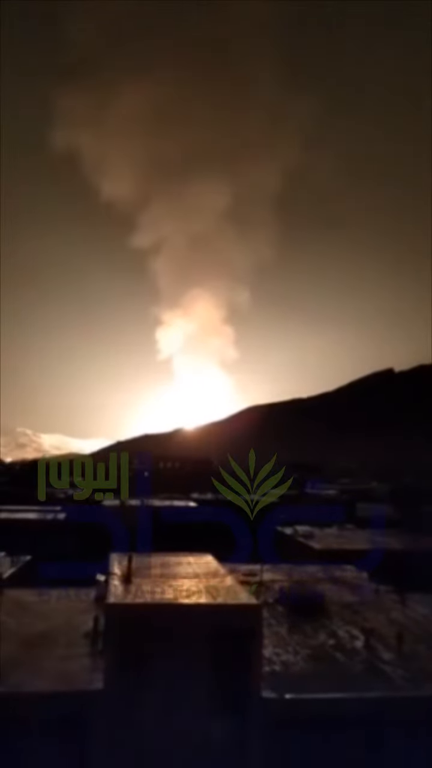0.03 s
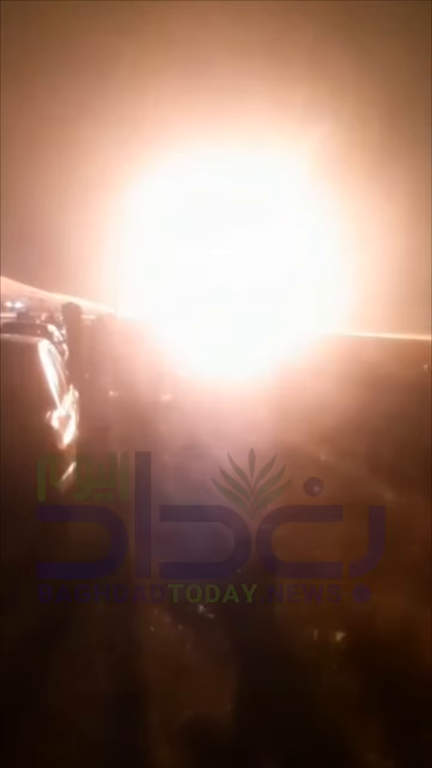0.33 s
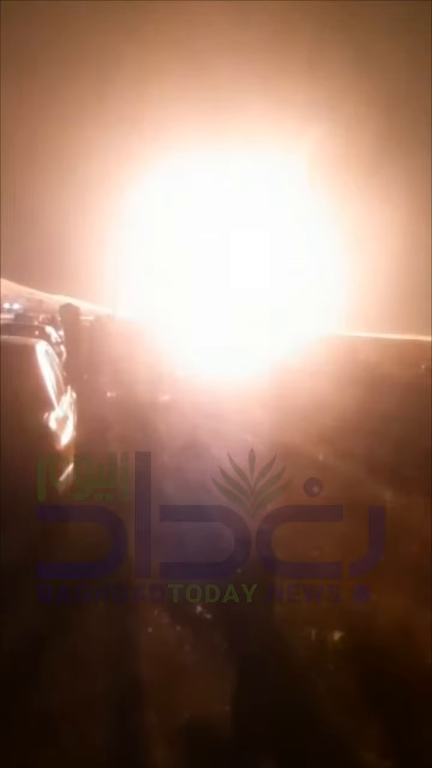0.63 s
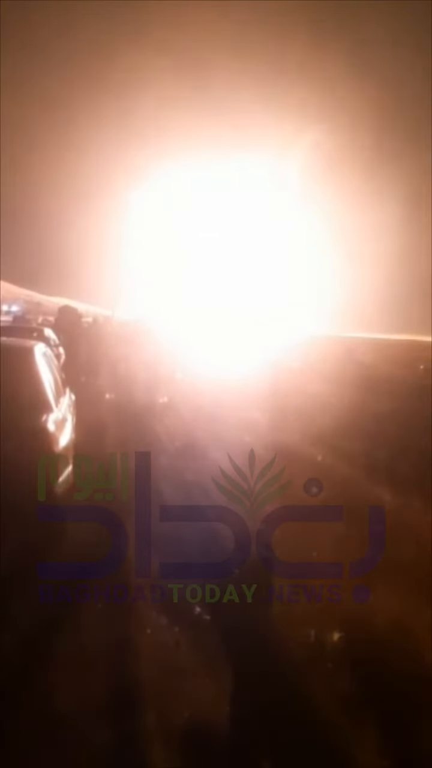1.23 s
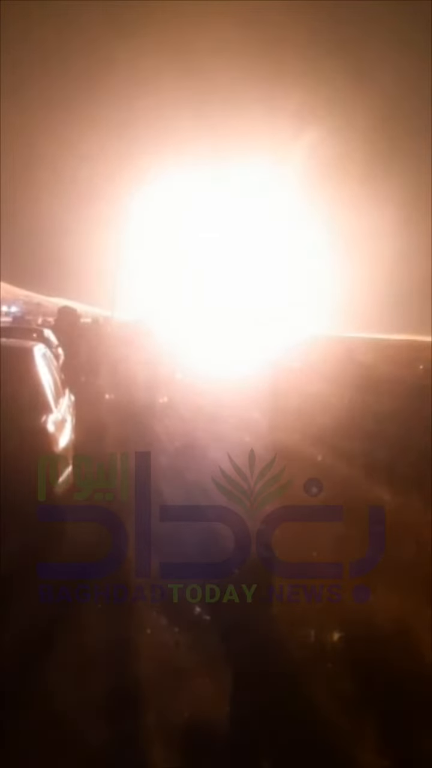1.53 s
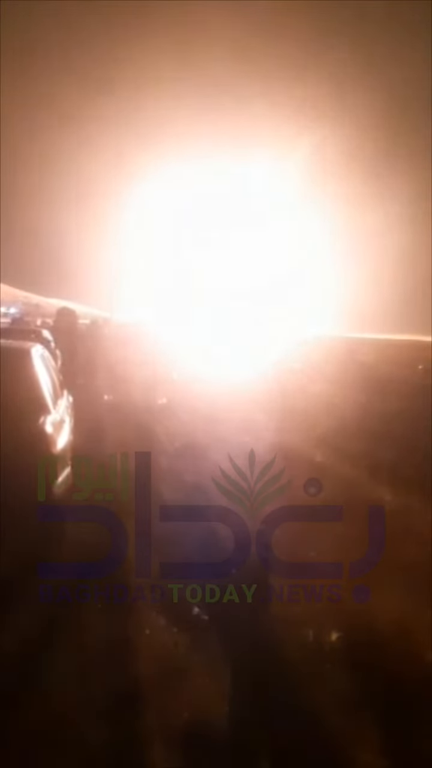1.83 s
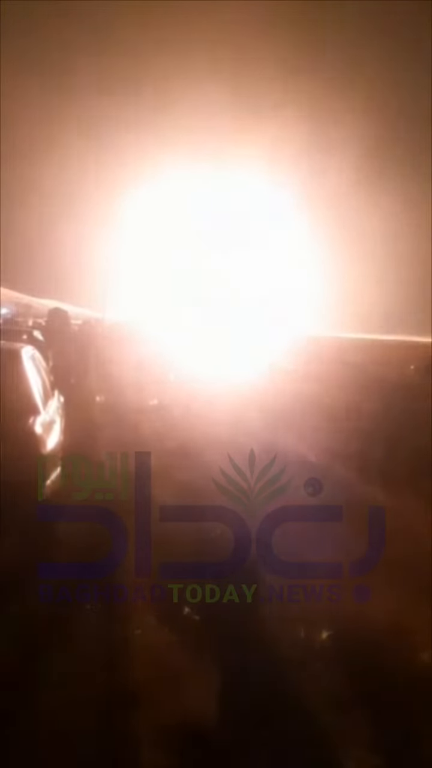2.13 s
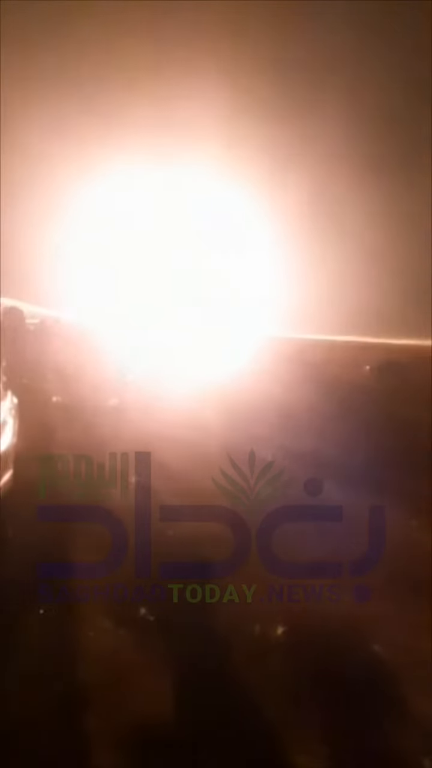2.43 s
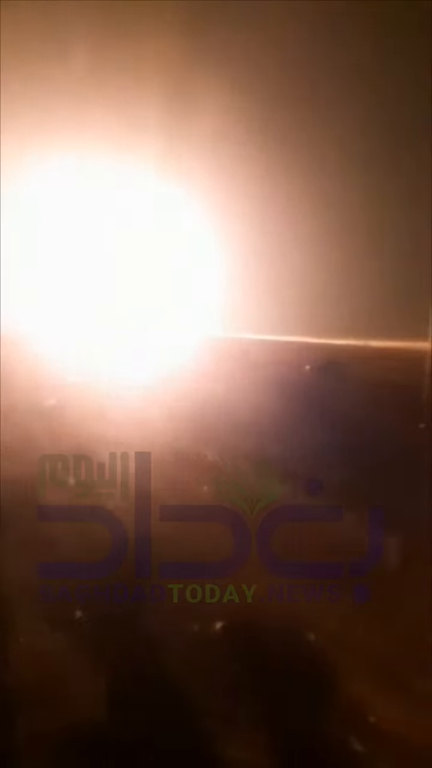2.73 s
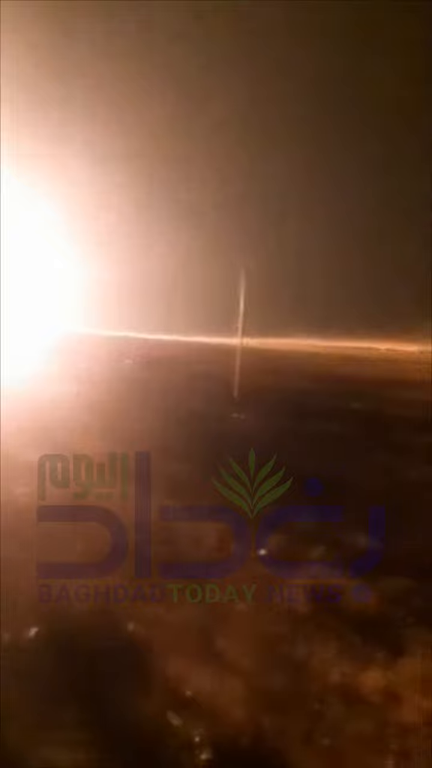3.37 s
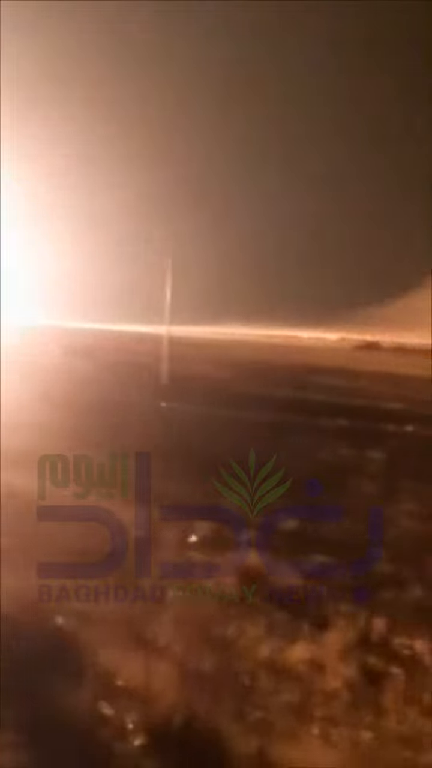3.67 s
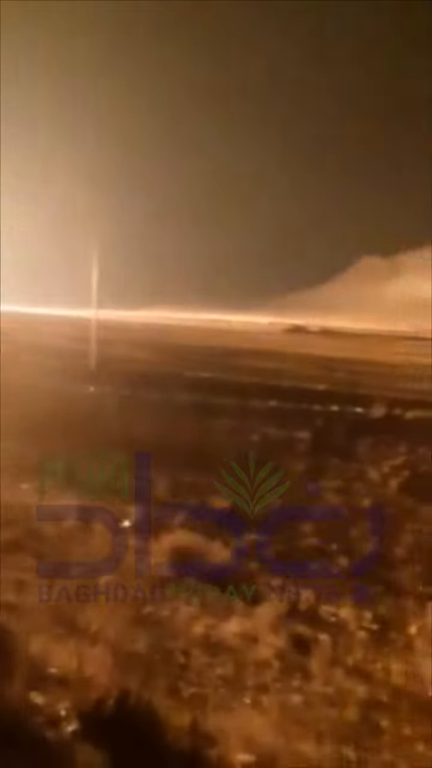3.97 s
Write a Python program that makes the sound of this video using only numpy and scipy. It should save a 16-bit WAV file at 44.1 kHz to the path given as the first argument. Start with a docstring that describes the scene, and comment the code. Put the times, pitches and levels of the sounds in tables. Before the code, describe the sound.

Heavy, continuous roar of a large gas blaze with deep throbs and a faint passing hiss.

```python
"""A huge gas fire burns outdoors at night. At first it is dull and far off, with deep throbs and surges of
billowing gas and a faint rustle. At 0.19 s the scene changes with a soft click and it is suddenly close: a dry
tick sounds, and turbulence makes a broad roar over a rumble. Near 1 s a hiss with a low drone, like a vehicle
on a wet road, passes from right to left. From 2.8 s the microphone turns away and the roar changes colour. At
the end a second hiss approaches."""
import sys
import numpy as np
from scipy import signal
from scipy.fft import rfft, irfft
from scipy.io import wavfile
from scipy.ndimage import uniform_filter1d, map_coordinates

SR = 44100
rng = np.random.default_rng(int(sys.argv[2]) if len(sys.argv) > 2 else 0)


def dump(signal):
    """Clip the signal to [-1, 1] and save it as 16-bit WAV at the path in sys.argv[1]."""
    limited = np.clip(np.atleast_2d(signal).T, -1, 1)
    pcm = np.round(limited * 32767).astype(np.int16)
    wavfile.write(sys.argv[1], SR, pcm)


N = 176400
TIME, HZ = np.arange(N) / SR, np.fft.rfftfreq(N, 1 / SR)
NEAR_FROM_S = 0.19


def amp(db):
    """Amplitude grows tenfold for every 20 dB."""
    return 10 ** (np.asarray(db) / 20)


def unit_rms(x):
    """Dividing by the rms value keeps a signal's shape and sets its power to one."""
    return x / np.sqrt(np.mean(abs(x) ** 2) + 1e-20)


def over_hz(table, column=1):
    """Interpolation on a logarithmic frequency axis makes a column a spectrum."""
    rows = np.array(table, float)
    return np.interp(np.log(HZ + 1), np.log(rows[:, 0] + 1), rows[:, column])


def over_time(table, column=1):
    """Linear interpolation gives a column a value at every sample."""
    rows = np.array(table, float)
    return np.interp(TIME, rows[:, 0], rows[:, column])


def white_spectrum():
    """White noise has random phase and equal mean power at all frequencies."""
    return rng.standard_normal(len(HZ)) + 1j * rng.standard_normal(len(HZ))


def low_pass(x, corner_hz, slope=4):
    """Above its corner, a low-pass filter tends to lose 6 dB per octave per unit of slope."""
    return irfft(rfft(x) / (1 + (HZ / corner_hz) ** slope), N)


def wander(rate_hz):
    """Low-passed noise is a slow random fluctuation, here of rms 1."""
    return unit_rms(irfft(white_spectrum() / (1 + (HZ / rate_hz) ** 4), N))


def pan(balance_db):
    """A level difference places a sound; balance is left minus right."""
    return amp(np.array([[0.5], [-0.5]]) * balance_db)


def stereo_noise(colour_db, coherence, left_lead=0, balance_db=0):
    """Partial coherence: two microphone ports share part of one noise, scaled to rms 1."""
    coherence = np.clip(coherence, 0, 1)
    left = white_spectrum()
    right = (coherence * left + np.sqrt(1 - coherence ** 2) * white_spectrum()) * np.exp(-1j * left_lead)
    return unit_rms(irfft(np.array([left, right]) * amp(colour_db) * pan(balance_db), N))


def burst(centre_s, half_length_s, hz, width_hz, db):
    """A Gaussian envelope modulates a band of noise; db is the nominal level at its crest."""
    swell = np.exp(-0.5 * ((TIME - centre_s) / half_length_s) ** 2)
    noise = irfft(white_spectrum() * np.exp(-0.5 * ((HZ - hz) / width_hz) ** 2), N)
    return amp(db) * unit_rms(noise * swell) * np.sqrt(np.mean(swell ** 2))


# The distant roar. Each row: frequency in Hz, relative spectral level in dB.
FAR_SPECTRUM = [(15, -36.5), (25, -23), (50, -8), (90, -6), (230, -13.5), (370, -18.5), (550, -21),
                (660, -21), (850, -35), (1200, -44.5), (1550, -51), (2050, -51.5), (2500, -70.5),
                (3100, -62), (3320, -55.5), (3560, -66.5), (4300, -74), (5000, -90.5), (7000, -82.5),
                (12000, -100)]
# Its likeness at the two ports. Each row: frequency in Hz, coherence from 0 to 1.
FAR_COHERENCE = [(60, 1), (300, .97), (640, 0.9), (1400, 0.71), (3100, 0.15), (9000, 0.51)]


def far_fire(level_db=-18, treble_start_db=-6.5, treble_rise_db_per_s=62):
    """Turbulent noise is dull at a distance; its treble grows until the fire is heard close."""
    colour_db = over_hz(FAR_SPECTRUM) - 10 * np.log10(1 + (HZ / 8000) ** 8)
    noise = amp(level_db) * stereo_noise(colour_db, over_hz(FAR_COHERENCE))
    low = low_pass(noise, corner_hz=1250, slope=6)
    treble_gain = amp(treble_start_db + treble_rise_db_per_s * np.minimum(TIME, NEAR_FROM_S))
    return low + (noise - low) * treble_gain


# Deep throbs. Each row: centre and half length in seconds, frequency in Hz, relative level in dB.
FLAME_THROBS = [(.055, 0.07, 59, -16.5), (0.311, .03, 46.4, -20), (0.406, .025, 52, -22),
                (0.614, 0.014, 59.3, -18.5), (0.722, 0.022, 52.7, -22.5), (0.967, .02, 58.6, -17.5),
                (1.077, 0.041, 55, -23.5), (1.219, 0.018, 59, -15), (1.307, .017, 61, -23.5),
                (1.53, 0.015, 59, -22), (1.65, 0.025, 55, -20), (1.766, .027, 60.3, -24),
                (1.99, 0.023, 45, -21), (2.092, 0.028, 60, -26.5), (2.225, 0.021, 60, -28),
                (2.365, 0.019, 56.3, -19), (2.5, 0.019, 59, -18.5), (2.68, .022, 53.6, -19.5),
                (2.77, .018, 52.6, -25), (2.844, 0.018, 60.4, -18.5), (2.972, 0.019, 51.4, -21),
                (3.158, 0.016, 50.6, -18), (3.222, 0.012, 61, -17), (3.363, .018, 52.7, -24),
                (3.47, 0.016, 56, -24), (3.805, 0.035, 52, -17.3), (3.942, 0.022, 61.7, -23.5)]
# Surges. Each row: centre and half length in seconds, frequency and width in Hz, level in dB.
FLAME_SURGES = [(0.042, 0.019, 187, 42, -18), (0.145, 0.014, 142, 20, -18), (.15, 0.032, 220, 26, -20),
                (0.223, 0.021, 256, 21, -24), (0.582, 0.041, 129, 10, -23), (.66, .03, 119, 8.4, -21.5),
                (0.847, 0.042, 204, 22, -26.5), (0.954, 0.034, 124, 12, -27.5),
                (1.185, 0.028, 130, 18, -23), (1.71, 0.022, 116, 16, -23.5), (2.072, 0.062, 132, 22, -25.5),
                (2.195, 0.031, 121, 20, -27), (2.52, 0.026, 129, 15, -20.5), (2.735, .035, 647, 65, -27.5),
                (2.893, 0.023, 251, 31, -28), (3.367, 0.15, 805, 110, -34), (3.48, 0.022, 127, 15, -27.5),
                (3.672, 0.036, 626, 150, -29.5), (3.92, 0.024, 112, 16, -26)]
FLAME_BALANCE_DB = -2.5


def flare_ups():
    """Unsteady combustion: billows of gas radiate deep throbs, and surges higher in the roar."""
    throbs = sum(burst(centre_s, half_length_s, hz, width_hz=5, db=db - 0.5)
                 for centre_s, half_length_s, hz, db in FLAME_THROBS)
    surges = sum(burst(*row) for row in FLAME_SURGES)
    return (throbs + surges) * pan(FLAME_BALANCE_DB)


# Faint scuffs and swells. Each row: centre and half length in seconds, frequency and width in Hz,
# level and balance in dB.
TREBLE_RUSTLES = [(0.076, 0.0022, 5400, 800, -60, -4), (0.951, .18, 4300, 550, -53.5, 0),
                  (.96, .014, 3500, 500, -46, 2), (1.8, .019, 12800, 1700, -60, -9),
                  (1.92, .03, 3500, 350, -51.5, -3), (2.093, .018, 4700, 700, -51.5, 1),
                  (2.175, .008, 13000, 1800, -61, -6), (2.306, .025, 6440, 1400, -60, -4),
                  (2.32, .025, 12500, 1800, -66, -7), (2.45, .004, 3300, 500, -61, 0),
                  (2.554, .05, 3450, 60, -60, -1), (2.57, .015, 6900, 1500, -64, -4),
                  (2.846, .03, 3450, 60, -59, 2), (2.995, .004, 3550, 500, -62, -2),
                  (3.19, 0.041, 3430, 80, -63, 0), (3.403, .004, 3250, 450, -63, 0),
                  (3.727, 0.0061, 3700, 800, -58, 3)]


def rustles():
    """Incoherent bursts of treble, independent at each port, sound diffuse."""
    return sum(pan(balance_db) * np.array([burst(*shape), burst(*shape)])
               for *shape, balance_db in TREBLE_RUSTLES)


def turn_angle(start_s=2.824, length_s=0.66):
    """Uniform rotation takes the microphone a quarter turn from the fire; the angle is in radians."""
    return np.clip((TIME - start_s) / length_s, 0, 1) * np.pi / 2


# The near roar, faced and turned away. Each row: frequency in Hz, relative spectral level in dB.
FACED_SPECTRUM = [(53, -32), (90, -8.5), (124, -3.5), (141, -10), (163, -8), (262, -8.5), (460, -14.5),
                  (501, -11.5), (664, -10), (957, -19.5), (1290, -28), (1500, -27.5), (1750, -36.5),
                  (2050, -37.5), (2600, -45), (3380, -54.5), (5720, -120)]
TURNED_SPECTRUM = [(53, -33), (90, -1), (215, -3.5), (259, -6), (285, -7.5), (373, -6), (545, -10.5),
                   (593, -8), (820, -12.5), (1040, -15.5), (1400, -25.5), (1990, -34), (2600, -37.5),
                   (3380, -50), (5720, -120)]
# How it meets the ports. Each row: frequency in Hz, coherence, left lead in radians, balance in dB.
FACED_STEREO = [(90, .998, -0.55, -3), (239, 1, 0.13, -3.5), (367, 0.98, 0.69, -5), (445, 0.64, 0.45, 1.5),
                (542, 1, -0.25, 3), (687, 0.86, 0.44, -4), (837, 0.86, 0.47, -12.5),
                (840, 0.56, 0.83, -4.5), (970, 0.81, 1.3, -4.5), (1240, 0.7, -0.64, 0.5),
                (1690, 0.54, 0.64, -6), (2030, 0.47, -.5, -1), (2500, 0.51, -0.79, 2)]
TURNED_STEREO = [(90, 0.94, 0.037, 0), (253, 1, 0.039, -4.5), (480, 0.85, 0.92, -2),
                 (700, 0.97, -0.53, 1.5), (840, 0.99, 0.64, -7.5), (1100, 0.87, 1.3, -5),
                 (1400, 0.47, 1.8, 1), (1600, .25, 1.6, -6), (2010, 0.49, -1.4, -2), (2500, .75, -1.1, -5)]
# Narrow peaks in the roar. Each row: frequency and width in Hz, boost in dB.
ROAR_RESONANCES = [(218, 27, 0.5), (1550, 110, 2.5), (2013, 53, 7), (3500, 250, 1)]


def roar(level_db=-22.5, low_hz=86, top_hz=2800, fall_db_per_octave=18):
    """Turbulent burning gas radiates broadband noise, whose colour depends on the microphone's angle."""
    treble_loss_db = fall_db_per_octave * np.log2(np.maximum(HZ / top_hz, 1))
    bass_loss_db = 10 * np.log10(1 + (low_hz / (HZ + 1)) ** 8)
    peaks_db = sum(db / (1 + (2 * (HZ - hz) / width) ** 2) for hz, width, db in ROAR_RESONANCES)
    views = []
    for spectrum, stereo in (FACED_SPECTRUM, FACED_STEREO), (TURNED_SPECTRUM, TURNED_STEREO):
        colour_db = over_hz(spectrum) - treble_loss_db - bass_loss_db + peaks_db
        views.append(stereo_noise(colour_db, over_hz(stereo), over_hz(stereo, 2), over_hz(stereo, 3)))
    faced, turned = views
    angle = turn_angle()
    return amp(level_db) * (np.cos(angle) * faced + np.sin(angle) * turned)


# The strength of the roar. Each row: time in seconds, gain in dB.
ROAR_GAIN = [(.2, 2), (.4, 0), (.9, 0.66), (1.3, 0.5), (1.8, -0.3), (2.3, -0.3), (2.7, 0.64), (3.2, -0.1),
             (3.5, -0.3), (4, 0.1)]


def roar_flutter(depth_db=0.36):
    """Amplitude modulation: the roar's gain drifts slowly and flutters at random."""
    return amp(over_time(ROAR_GAIN) + depth_db * wander(rate_hz=25))


# The rumble between throbs. Each row: frequency in Hz, relative spectral level in dB.
RUMBLE_SPECTRUM = [(15, -43), (25, -29), (32, -20), (40, -2.5), (50, 0.5), (62, -5.5), (75, -4), (95, -13),
                   (140, -48), (300, -100)]


def rumble(level_db=-25, steadiness=0.65):
    """The whole flame drives the air in deep narrowband noise, its uneven envelope partly levelled."""
    wave = irfft(white_spectrum() * amp(over_hz(RUMBLE_SPECTRUM)), N)
    envelope = np.sqrt(uniform_filter1d(abs(signal.hilbert(wave)) ** 2, size=3000))
    return amp(level_db) * unit_rms(wave / envelope ** steadiness) * pan(FLAME_BALANCE_DB)


# Spray from a wet road. Each row: frequency in Hz, relative spectral level in dB.
SPRAY_SPECTRUM = [(500, -20.5), (1500, 4), (2800, 2.5), (3600, 0.5), (4700, -1.5), (5500, -5.5), (6400, -6),
                  (7300, -5), (8000, -12), (8600, -29), (9700, -17.5), (11500, -10.5), (13500, -14),
                  (15800, -14.5)]
# Its likeness at the two ports. Each row: frequency in Hz, coherence from 0 to 1.
SPRAY_COHERENCE = [(2000, 0.86), (3300, 0.73), (4700, 0.51), (7000, 0.43), (15000, .15)]


def tyre_spray(drops_per_s=500, drops_db=-12):
    """Shot noise: scattered drops are random impulses over the steady wash of spray."""
    colour_db = over_hz(SPRAY_SPECTRUM)
    wash = stereo_noise(colour_db, over_hz(SPRAY_COHERENCE))
    hits = rng.random(N) < drops_per_s / SR
    sizes = amp(-2.5 * np.minimum(rng.exponential(1, N), 5))
    impulses = hits * sizes * rng.standard_normal((2, N))
    drops = unit_rms(irfft(rfft(impulses) * amp(colour_db), N))
    return wash + amp(drops_db) * drops


# Vehicles. Each row: nearest moment in seconds, level then in dB, crossing time scale in seconds.
VEHICLE_PASSES = [(.92, -42, 2.3), (4.25, -51.5, 1.4)]
APPROACH_S, LEAVE_S = 0.27, 0.49  # half power this long before and after the nearest moment
PORT_DELAY_S, SPRAY_LAG_S = 0.000085, 0.084  # largest delay between ports; spray trails the vehicle


def passing_hiss(nearest_s, db, crossing_s, flicker_db=1.12):
    """Pressure falls inversely with distance; a changing delay carries the spray from right to left."""
    left, right = tyre_spray()
    age = TIME - nearest_s
    delay_samples = PORT_DELAY_S * SR * np.tanh((age - SPRAY_LAG_S) / crossing_s)
    right = map_coordinates(right, [np.arange(N) - delay_samples], order=5, mode="nearest")
    relative_distance = np.hypot(1, age / np.where(age < 0, APPROACH_S, LEAVE_S))
    return np.array([left, right]) * amp(db + flicker_db * wander(rate_hz=24)) / relative_distance


def off_axis(sound, treble_db=-5.5):
    """Directivity: the microphone hears less of the highest treble as it turns."""
    low = low_pass(sound, corner_hz=7500)
    return low + (sound - low) * amp(treble_db * np.sin(turn_angle()))


# The low engine note. Each row: time in seconds, frequency in Hz, level in dB.
ENGINE_NOTE = [(.2, 138, -31.5), (.55, 133, -31.5), (.84, 132, -40), (.95, 133, -24.5), (1.25, 132, -32),
               (1.55, 128, -36.5), (2.1, 130, -35), (2.45, 125, -29.5), (3, 122, -59)]


def engine_drone(waver_hz=3, throb_db=3.5):
    """Random frequency and amplitude modulation make an engine's tone waver and throb."""
    cycles = np.cumsum(over_time(ENGINE_NOTE) + waver_hz * wander(rate_hz=7.5)) / SR
    tone = np.sin(2 * np.pi * cycles) * amp(throb_db * wander(rate_hz=9.9))
    return unit_rms(tone) * amp(over_time(ENGINE_NOTE, column=2)) * pan(balance_db=-3)


# A soft click as the scene changes, then a close, dry tick. Each row: time in seconds, crack level in dB,
# balance in dB, snap level in dB.
TICK_EVENTS = [(0.1906, -31.5, 4, -58), (0.2866, -29, -8.5, -37)]
# The colour of each crack. Each row: frequency in Hz, relative spectral level in dB.
CRACK_SPECTRUM = [(500, -6), (1800, -1), (2900, 4), (3700, 1), (5000, -3), (7000, -6), (9000, -9),
                  (11800, -7), (15800, -10)]


def ticks(decay_s=0.00053):
    """A brief transient has a broad spectrum: each tick is a crack with a snap in the upper mids."""
    out = np.zeros((2, N))
    for centre_s, crack_db, balance_db, snap_db in TICK_EVENTS:
        envelope = amp(crack_db) * np.exp(-abs(TIME - centre_s) / decay_s)
        crack = envelope * stereo_noise(over_hz(CRACK_SPECTRUM), coherence=0.33)
        snap = burst(centre_s, half_length_s=0.0006, hz=3150, width_hz=600, db=snap_db)
        out += pan(balance_db) * (crack + snap)
    return out


def scene(crossfade_s=0.0012):
    """Superposition: the sources add, and the far sound gives way at once to the near one."""
    near = roar() * roar_flutter() + rumble()
    near += off_axis(sum(passing_hiss(*row) for row in VEHICLE_PASSES)) + engine_drone()
    near_share = np.clip((TIME - NEAR_FROM_S) / crossfade_s + 0.5, 0, 1)
    return (1 - near_share) * far_fire() + near_share * near + flare_ups() + ticks() + rustles()


def record(dry, edge_hz=15800, fade_s=0.002):
    """Band limiting: a steep low-pass filter removes the top treble, and short fades soften the ends."""
    fades = np.clip(np.minimum(TIME, TIME[-1] - TIME) / fade_s, 0, 1)
    kernel = signal.firwin(511, edge_hz, window=("kaiser", 9), fs=SR)
    return signal.oaconvolve(dry * fades, kernel[None], "same")


dry = scene()
out = record(dry)
dump(out)
```